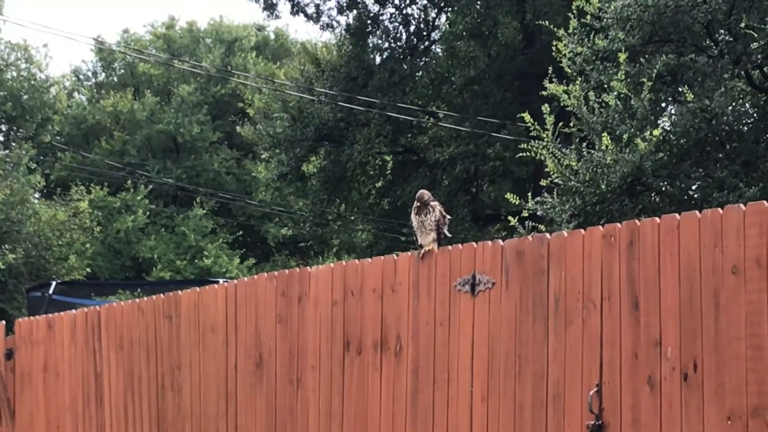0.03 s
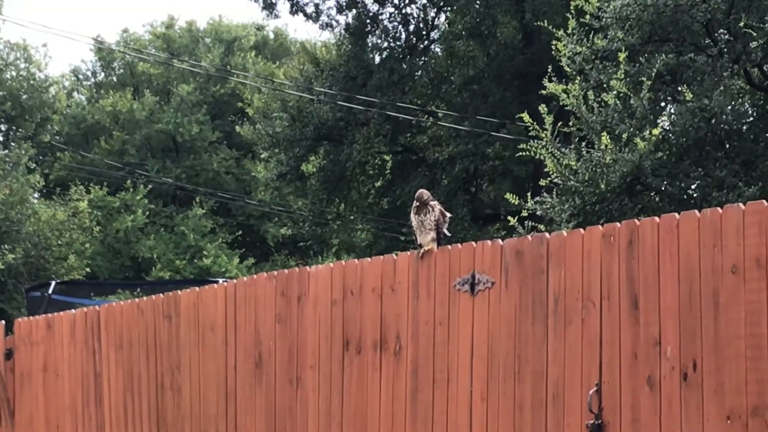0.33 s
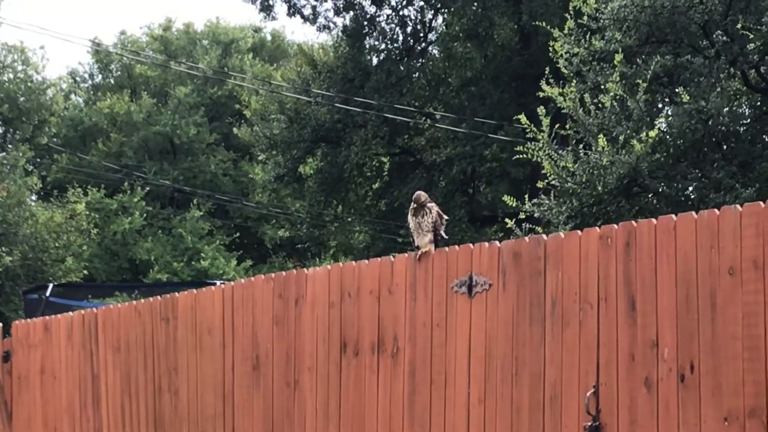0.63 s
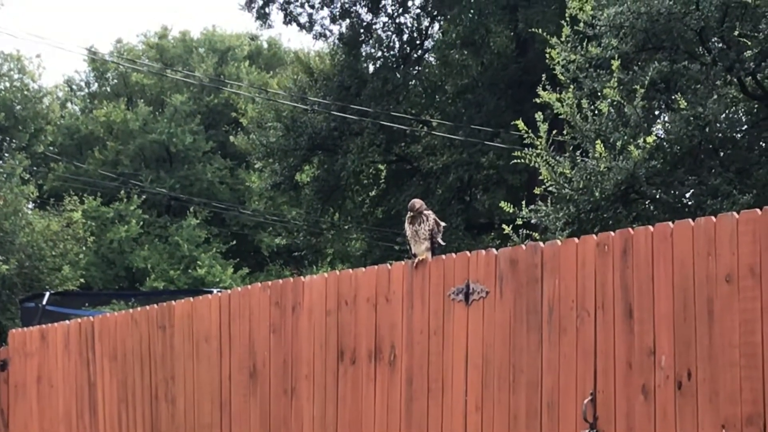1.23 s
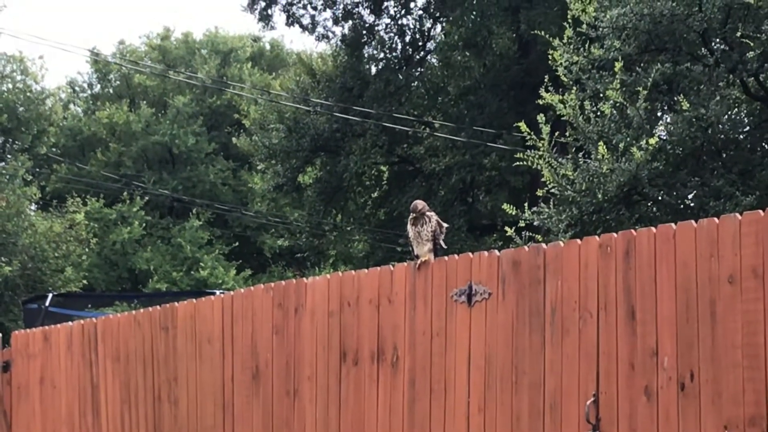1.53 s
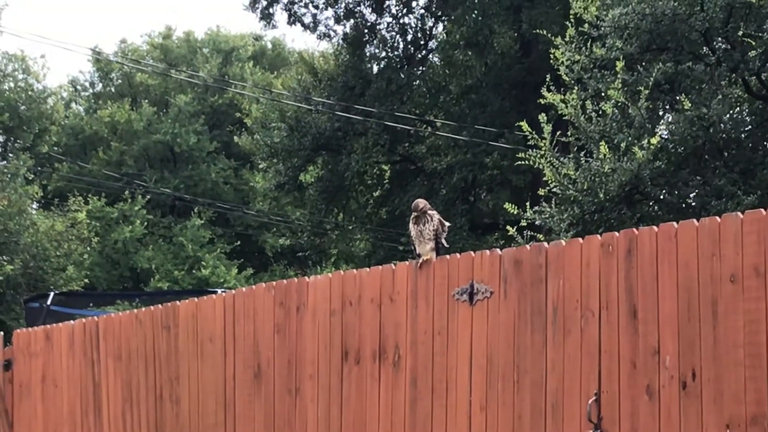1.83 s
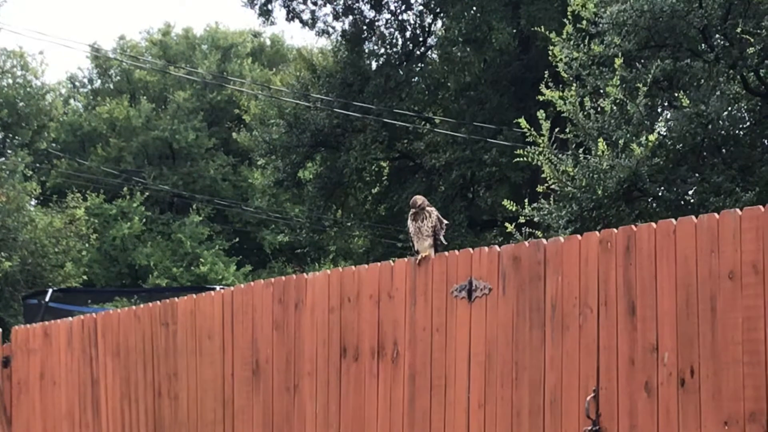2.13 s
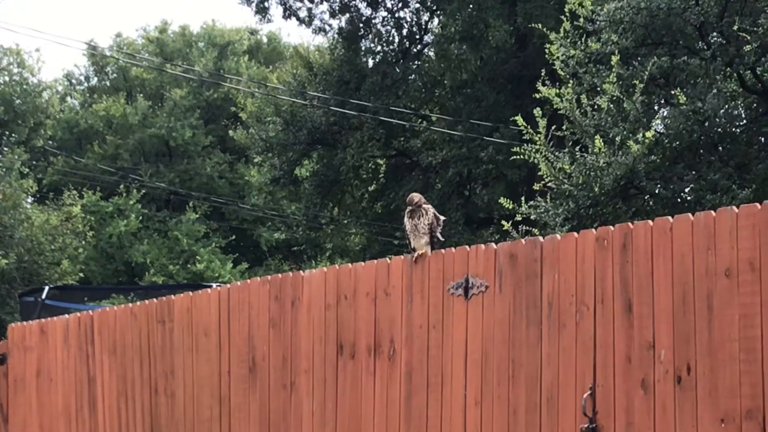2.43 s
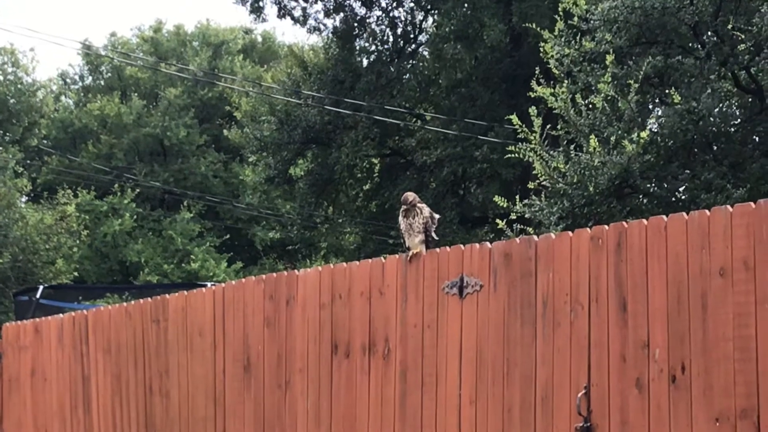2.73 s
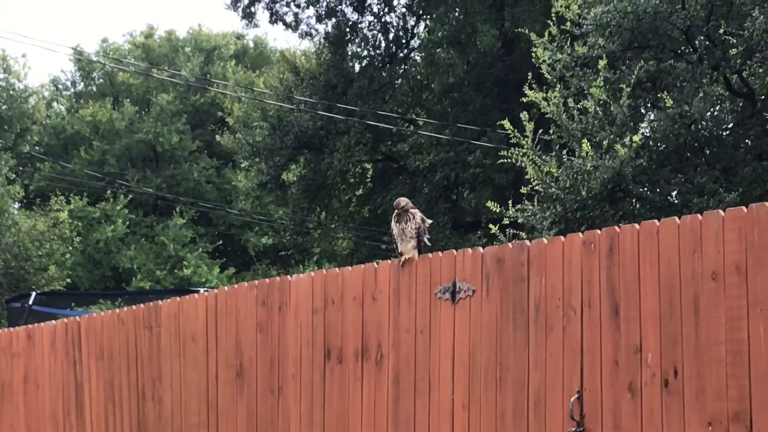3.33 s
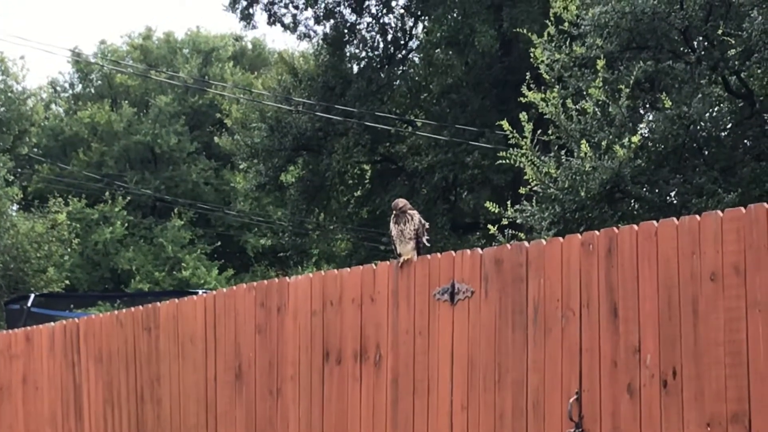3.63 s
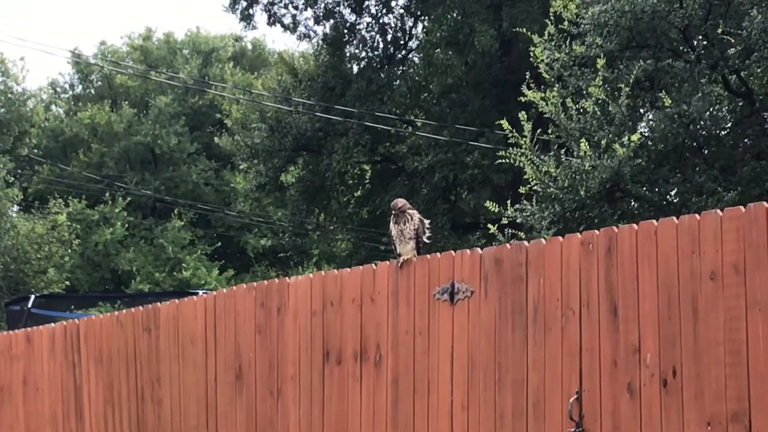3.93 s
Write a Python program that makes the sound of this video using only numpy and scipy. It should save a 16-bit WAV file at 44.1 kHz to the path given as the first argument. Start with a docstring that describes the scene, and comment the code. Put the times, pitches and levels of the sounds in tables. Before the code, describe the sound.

A nearby hawk squeals upward, squawks harshly, rasps, then holds a high whistle that rings briefly through a garden. Afterward, faint bird chatter and sharp chips continue over a steady insect buzz and a low distant rumble.

```python
"""A garden, with a hawk on the fence: it gives a rising squeal, a harsh squawk, a rasp and a long whistle.
Squeal and whistle are harmonic tones of the syrinx, the squawk is a pulse train ringing the throat,
and the rasp is fluttering noise. Other birds answer from the trees with faint rising whistles,
chatter and sharp chips. Insects buzz steadily over a distant low rumble and the hiss of open air.
The fence returns distinct reflections of the calls, the foliage a diffuse reverberation."""
import sys
import numpy as np
from scipy import signal
from scipy.fft import rfft, irfft
from scipy.io import wavfile

SR = 44100
rng = np.random.default_rng(int(sys.argv[2]) if len(sys.argv) > 2 else 0)


def wrap_up_sound(samples):
    """Save the sound to the file named by the first command line argument, as 16-bit audio."""
    columns = np.atleast_2d(samples).T
    # keep every value between -1 and 1, then stretch to whole-number steps
    tamed = np.clip(columns, -1, 1)
    steps = np.round(tamed * 32767).astype(np.int16)
    wavfile.write(sys.argv[1], SR, steps)


N = 176400
TIME = np.arange(N) / SR

# Spectra of the steady noises: frequency_hz, gain_db
RUMBLE_SPECTRUM = [(20, -29), (32, -24), (48, -11), (66, -4.5), (77, 1.5), (90, -9.5), (125, -9.5),
                   (165, -14.5), (220, -19.5), (300, -30.5), (450, -39.5), (900, -76)]
AIR_SPECTRUM = [(150, -35), (250, -4), (372, -8.5), (658, -5), (882, -9.5), (961, -9), (1200, -18),
                (1610, -20.5), (2090, -21), (2800, -20), (4170, -19.5), (6000, -28.5), (7510, -30.5),
                (8620, -10), (9070, -21), (9890, -54), (11100, -32), (11800, -37), (12700, -36.5),
                (15500, -41)]
INSECT_SPECTRUM = [(6000, -63), (7400, -18.5), (8000, -10.5), (8600, 4.5), (8900, 0), (9300, -15),
                   (10000, -33), (11000, -60)]
# Far-off hums: centre_s, length_s, frequency_hz, width_hz, level_db
HUMS = [(0.094, 0.14, 590, 90, -51.5), (2.75, 0.25, 660, 120, -57.5), (3.852, 0.96, 676, 25, -61.5),
        (3.849, 0.68, 757, 70, -67)]
# Envelope of the far midrange wash: time_s, level_db
WASH_ENVELOPE = [(0, -69.5), (1.5, -61.5), (2.6, -63), (3.4, -62), (3.7, -78), (4, -81)]
# Reverberation time of the trees: frequency_hz, t60_s
TREE_DECAY = [(500, 0.61), (2500, 0.93), (6000, 0.87), (12000, 0.71)]
# Reflections from boards and ground: delay_s, gain
REFLECTIONS = [(.0043, 0.14), (.013, 0.12), (.029, .1), (.061, .09), (.084, .07)]

# Far rising whistles: end_s, length_s, top_pitch_hz, level_db
FAR_CALLS = [(0.156, 0.36, 1895, -62.5), (0.794, 0.37, 1910, -56.5), (1.391, .33, 1869, -58.5),
             (2.028, 0.33, 1895, -59.5), (2.722, 0.37, 1848, -59.5)]
# Their shared contour: length_fraction, pitch_ratio, gain_db
FAR_CONTOUR = [(0, .61, -3.5), (.3, .655, -2), (.55, .72, 1), (.78, .89, 2), (0.929, 0.98, -2.5),
               (1, 0.99, 1)]
# Their harmonics: harmonic_number, gain_db
FAR_PARTIALS = [(1, 2.5), (2, -7), (3, -4), (4, 0)]
# Their filtering on the way through the trees: frequency_hz, gain_db
FAR_PATH_RESPONSE = [(1500, 0), (2300, -4), (2850, 4.5), (3700, 1), (4200, -10), (4700, -14), (5300, -6.5),
                     (6200, -21)]
# Far chatter, and at the very start the high fading tail of an earlier call:
# centre_s, length_s, pitch_hz, width_hz, level_db
CHATTER_AND_TAIL = [(0.025, 0.18, 4350, 707, -54), (.02, 0.18, 6200, 1100, -64),
                    (0.039, 0.16, 3030, 500, -55), (0.779, 0.092, 4550, 304, -56),
                    (1.942, .1, 3100, 357, -63), (1.98, 0.08, 2540, 151, -57.5),
                    (2.2, 0.24, 3630, 946, -63.5), (2.292, 0.25, 2446, 139.1, -66.5),
                    (2.365, 0.17, 4060, 587, -60.5), (2.635, 0.18, 3100, 394, -59),
                    (2.83, 0.21, 3250, 497, -65.5), (2.93, 0.086, 3185, 703, -62),
                    (3.019, .2, 3360, 457, -61.5), (3.156, 0.16, 3730, 857, -57),
                    (3.3, 0.22, 3890, 551, -69), (3.54, 0.18, 3763, 701, -66.5),
                    (3.645, 0.16, 2780, 221, -63.5), (3.91, 0.083, 4230, 555, -56.5),
                    (3.965, .09, 3950, 800, -59)]
# Chips of a small bird: start_s, top_pitch_hz, level_db, sweep_fraction
CHIP_NOTES = [(.934, 7830, -48, .24), (1.7135, 7670, -43, 0.25), (2.723, 7810, -41.5, .25),
              (3.451, 7470, -49, 0.14)]

# Dull ticks, crisp snicks and sharp snaps: start_s, level_db, decay_s
DULL_TICKS = [(.183, -48, .008), (.193, -38, 0.008), (.477, -41, 0.0045), (.486, -40, 0.0059),
              (.506, -37, 0.0026), (.76, -47.5, 0.015), (.773, -43, 0.0057)]
CRISP_SNICKS = [(.18, -58, .014), (.477, -48, 0.0044), (.486, -48, .005), (.506, -50, .003),
                (.773, -57, 0.0034), (2.922, -56.5, 0.021)]
SHARP_SNAPS = [(.9115, -33, 0.0027), (.917, -43, 0.0068), (.967, -39, 0.0018), (1.2245, -34, 0.0039),
               (1.265, -38, 0.0019)]
# Their spectra: frequency_hz, gain_db
TICK_SPECTRUM = [(250, -18), (600, -9), (950, -1.5), (1600, -14), (3500, -24), (5800, -17.5), (7000, -30),
                 (15000, -45)]
SNICK_SPECTRUM = [(2000, -12), (5000, 8), (9000, -4), (13000, 2), (15500, -5)]
SNAP_SPECTRUM = [(410, -44), (700, -30), (1450, -6), (2030, -23), (2370, -1), (3490, -13.5), (4520, -9),
                 (8760, -19), (15500, -44)]

# The hawk's rasps: start_s, length_s, level_db, decay_s
RASP_BURSTS = [(0.967, 0.022, -44.5, 0.034), (1.045, 0.039, -47.5, 0.03), (1.228, 0.0396, -44, 0.043),
               (1.263, 0.15, -37.5, 0.044)]
# Hoarse tones in the last rasp: frequency_hz, width_hz, level_db
HOARSE_TONES = [(1600, 210, -44), (3910, 110, -44.5), (5450, 120, -47), (7770, 150, -55)]
# Spectra of the rasp and of the hiss in the squeal: frequency_hz, gain_db
RASP_SPECTRUM = [(530, -46), (900, -13), (1320, -22), (1560, -4), (2100, -3), (2200, -5), (3670, -4.5),
                 (3890, -6.5), (5000, -15.5), (5570, -12), (5980, -11), (7860, -11.5), (15500, -33)]
SQUEAL_HISS_SPECTRUM = [(1500, -24), (3500, -4), (6300, 2), (8000, -4), (12000, -13), (15500, -20)]
# Course of the squawk: time_s, pulse_rate_hz, level_db
SQUAWK_CONTOUR = [(.985, 307, -40), (.988, 315, -29.5), (.996, 311.8, -35), (1.004, 313, -30),
                  (1.016, 316, -29.5), (1.042, 312, -30.5), (1.046, 309, -35), (1.06, 302, -52)]
# Resonances of the throat in the squawk: frequency_hz, gain_db
THROAT_RESPONSE = [(600, -45), (950, -36), (1254, -15.5), (1570, -38), (1890, -27), (2195, 3), (2510, -3),
                   (2820, -46), (3150, -22.5), (3760, -15.5), (4100, -31), (4700, -12), (5300, -22),
                   (6300, -14), (7250, -14.5), (7900, -25), (8500, -20), (9500, -29.5), (11200, -27),
                   (13000, -35), (15500, -54)]
# The squeal with its lead-in, and a brief note from the second side of the syrinx:
# time_s, pitch_hz, fundamental_db, second_harmonic_db, upper_harmonics_db
LEAD_IN_CONTOUR = [(0.1, 1096, -76, -60, -66), (0.14, 1441, -61.5, -51.5, -69),
                   (0.192, 1760, -63, -47, -69), (0.208, 1796, -52.5, -46.5, -65),
                   (0.235, 1475, -53.5, -59, -67)]
SQUEAL_CONTOUR = [(.235, 1173, -75, -41.5, -57), (.261, 1249, -55.5, -50.5, -59.5),
                  (0.334, 1568, -44, -50.5, -53.5), (.35, 1625, -47.5, -56, -63),
                  (.395, 1956, -50, -48, -52.5), (.435, 2156, -42.5, -50.5, -57),
                  (.475, 2351, -34.5, -39.5, -48.5), (.515, 2552, -34.5, -53.5, -48.5),
                  (.541, 2687, -39.5, -61, -56), (.559, 3010, -33, -56, -60), (.583, 3160, -33, -56, -76),
                  (.615, 3310, -42, -70, -79), (.635, 3340, -58, -70, -80), (.655, 3430, -64, -78, -92)]
SECOND_SIDE_CONTOUR = [(1.335, 2150, -66, -56, -66), (1.368, 2230, -53, -54.5, -66),
                       (1.392, 2200, -68, -56, -54)]
# The held whistle as heard with its echo, which notches it by interference and rings on after 1.7 s:
# time_s, pitch_hz, fundamental_db, second_harmonic_db, upper_harmonics_db
WHISTLE_WITH_ECHO = [(1.325, 2510, -50, -68, -85), (1.362, 2773, -48, -49, -50.5),
                     (1.378, 2790, -42.5, -43.5, -53.5), (1.408, 2861, -34.5, -30.5, -47.5),
                     (1.425, 2850, -33.5, -29.5, -49), (1.458, 2867, -29.5, -34, -52.5),
                     (1.486, 2865, -26, -45, -53.5), (1.508, 2850, -48, -45, -56),
                     (1.527, 2846, -28.5, -44.5, -58), (1.576, 2876, -35, -51, -56),
                     (1.6, 2856, -52, -71, -60), (1.62, 2840, -44, -50.5, -59),
                     (1.664, 2821, -34, -60, -61), (1.685, 2820, -52, -51, -61),
                     (1.705, 2830, -47, -77, -64), (1.74, 2848, -44, -85, -74),
                     (1.88, 2896, -50.5, -92, -90), (1.96, 2845, -57, -99, -99)]
# Balance of the upper harmonics in these notes: harmonic_number, gain_db
LEAD_IN_OVERTONES = [(3, 1.5), (4, 1), (5, -1), (6, -9)]
SQUEAL_OVERTONES = [(3, -1.5), (4, 1), (5, -9), (6, -1), (7, -5), (8, -13), (9, -12), (10, -19), (11, -16)]
WHISTLE_OVERTONES = [(3, 7.5), (4, 9), (5, -8)]
# Spectral envelope of those harmonics, duller toward the top: frequency_hz, gain_db
OVERTONE_RESPONSE = [(3500, 13), (4700, -10.5), (6300, 2), (7000, -6), (8000, -3.5), (11500, -8),
                     (14500, -6), (15700, -19)]


def amp(db):
    """Amplitude ratio of a level in decibels."""
    return 10 ** (np.asarray(db) / 20)


def unit(x):
    """Normalisation to an rms of 1."""
    return x / np.sqrt(np.mean(x ** 2) + 1e-20)


def curve_at(points, hz):
    """Interpolation on a logarithmic frequency axis."""
    f, value = np.transpose(points)
    return np.interp(np.log(hz + 1), np.log(f + 1), value)


def add(mix, start_s, sound):
    """Superposition: a sound adds to the mix from a given time."""
    at = round(start_s * SR)
    sound = sound[max(-at, 0):]
    part = mix[max(at, 0):][:len(sound)]
    part += sound[:len(part)]


def noise(spectrum):
    """Spectral shaping: white noise takes on a given colour."""
    gain = amp(curve_at(spectrum, np.fft.rfftfreq(N, 1 / SR)))
    return unit(irfft(rfft(rng.standard_normal(N)) * gain, N))


def band(hz, width_hz):
    """Noise in a Gaussian band; centred on 0 Hz it is a random drift."""
    bell = np.exp(-2 * ((np.fft.rfftfreq(N, 1 / SR) - hz) / width_hz) ** 2)
    return unit(irfft(rfft(rng.standard_normal(N)) * bell, N))


def gate(start_s, end_s, edge_s):
    """An envelope with linear attack and release."""
    return np.clip((TIME - start_s) / edge_s, 0, 1) * np.clip((end_s - TIME) / edge_s, 0, 1)


def phase_of(hz):
    """Phase in radians is the time integral of angular frequency."""
    return 2 * np.pi * np.cumsum(hz) / SR


def background(rumble_db=-39.5, air_db=-54, swell_db=-0.55):
    """Broadband noise: a distant low rumble and the gently wavering hiss of open air."""
    rumble = amp(rumble_db) * noise(RUMBLE_SPECTRUM)
    air = amp(air_db) * noise(AIR_SPECTRUM) * amp(swell_db * band(0, 9.2))
    return rumble + air


def drones(wash_hz=1157, wash_width_hz=650):
    """Band-limited noise: narrow bands are heard as far hums, a wide one as a midrange wash."""
    hums = sum(amp(db) * band(hz, width) * gate(centre - length / 2, centre + length / 2, length / 2)
               for centre, length, hz, width, db in HUMS)
    wash_level = amp(np.interp(TIME, *np.transpose(WASH_ENVELOPE)))
    return hums + wash_level * band(wash_hz, wash_width_hz)


def insects(level_db=-59, stroke_hz=61.3, drift=0.0032, sweep_hz=170, depth=0.48, snap=0.18):
    """Amplitude and frequency modulation: a high noise band throbs and slides up with each stroke."""
    stroke = phase_of(stroke_hz * (1 + drift * band(0, 6.7)))
    shift_hz = sweep_hz * (np.sin(stroke) - 0.5 * np.sin(2 * stroke))
    buzz = (signal.hilbert(noise(INSECT_SPECTRUM)) * np.exp(1j * phase_of(shift_hz))).real
    throb = 1 + depth * np.cos(stroke) + snap * np.cos(2 * stroke)
    return amp(level_db) * unit(buzz * throb)


def trees(x, reflections_per_s=3000, onset_s=0.0046, early_db=3, early_s=0.016):
    """Scattering: foliage returns many weak reflections, whose decay time depends on frequency."""
    t = TIME[:SR]
    taps = rng.standard_normal(SR) * (rng.random(SR) < reflections_per_s / SR)
    taps *= np.clip(t / onset_s, 0, 1)
    taps *= 1 + amp(early_db) * np.exp(-t / early_s)  # the nearest leaves reflect most strongly
    hz, frame_s, spectra = signal.stft(taps, SR, nperseg=256)
    decay = amp(-60 * frame_s / curve_at(TREE_DECAY, hz)[:, None])
    tail = signal.istft(spectra * decay, SR, nperseg=256)[1]
    return signal.fftconvolve(x, tail / np.linalg.norm(tail))[:N]


def fence(x):
    """Early reflections: boards and ground add a few delayed copies to the direct sound."""
    out = x.copy()
    for delay_s, gain in REFLECTIONS:
        add(out, delay_s, gain * x)
    return out


def far_whistles(jitter=0.0044, flicker=0.28):
    """Propagation through trees filters the harmonics of rising whistles and makes them flicker."""
    out = np.zeros(N)
    fraction, pitch_ratio, swell_db = np.transpose(FAR_CONTOUR)
    for end, length, top_hz, db in FAR_CALLS:
        progress = np.arange(0, length, 1 / SR) / length
        n = len(progress)
        pitch = top_hz * np.interp(progress, fraction, pitch_ratio) * (1 + jitter * band(0, 100)[:n])
        phase = phase_of(pitch)
        tone = np.zeros(n)
        for k, gain_db in FAR_PARTIALS:
            path_gain = amp(curve_at(FAR_PATH_RESPONSE, k * pitch))
            fluctuation = 1 + flicker * k * band(0, 53)[:n]
            tone += amp(gain_db) * path_gain * fluctuation * np.sin(k * phase)
        envelope = amp(db + np.interp(progress, fraction, swell_db)) * signal.windows.tukey(n, 0.1)
        add(out, end - length, tone * envelope)
    return out


def chatter_and_tail(notes_per_s=55, note_s=0.04, slide_hz_per_s=4600, spread=0.5, blur=0.92):
    """Linear chirps blurred by scattering in leaves: far chatter and an earlier call's high tail."""
    out, t = np.zeros(N), np.arange(0, note_s, 1 / SR)
    for centre, length, hz, width, db in CHATTER_AND_TAIL:
        start, end = centre - length / 2, centre + length / 2
        notes = np.zeros(N)
        for at in np.arange(start, end, 1 / notes_per_s):
            offset, slide, late = rng.standard_normal(3)
            pitch = hz + spread * width * offset + slide_hz_per_s * slide * (t - note_s / 2)
            add(notes, at - note_s / 2 + 0.005 * late, np.hanning(len(t)) * np.sin(phase_of(pitch)))
        out += amp(db) * (0.98 * notes + blur * band(hz, width)) * gate(start, end, length / 2)
    return out


def chips(length_s=0.016, peak_fraction=0.62, octave_db=-24, fade_db=-9):
    """Rapid frequency sweeps: each chip of a small bird rises, tops out and turns down."""
    out, progress = np.zeros(N), np.arange(0, length_s, 1 / SR) / length_s
    below_top = np.cos(np.pi / 2 * progress / peak_fraction) ** 2
    arch = 2 * np.sqrt(abs(np.sin(np.pi * progress)))
    for start, top_hz, db, sweep in CHIP_NOTES:
        phase = phase_of(top_hz * (1 - sweep * below_top))
        tone = np.sin(phase) + amp(octave_db) * np.sin(2 * phase)
        add(out, start, amp(db + fade_db * progress) * arch * tone)
    return out


def clicks(bursts, spectrum):
    """Transients: noise with a sudden onset and a fast exponential decay."""
    envelope = sum((TIME > start) * amp(db) * np.exp(-abs(TIME - start) / decay)
                   for start, db, decay in bursts)
    return noise(spectrum) * envelope


def rasps(flutter_hz=310, depth=0.26, tones_start_s=1.266, tones_length_s=0.03):
    """Roughness from fast amplitude modulation: harsh noise flutters, and hoarse tones catch in it."""
    flutter = 1 + depth * np.sin(phase_of(flutter_hz * (1 + 0.302 * band(0, 145))))
    envelope = sum(gate(start, start + length, 0.0026) * amp(db) * np.exp(-abs(TIME - start) / decay)
                   for start, length, db, decay in RASP_BURSTS)
    tones = sum(amp(db) * band(hz, width) for hz, width, db in HOARSE_TONES)
    tones *= gate(tones_start_s, tones_start_s + tones_length_s, 0.0071)
    return envelope * flutter * noise(RASP_SPECTRUM) + tones


def squawk(jitter=0.0054, hiss_gain=0.066, open_s=0.008, shut_db_per_octave=-10,
           phase_spread_rad=0.8, sweep_hz_per_s=3e6):
    """Source and filter: fast pulses ring the throat, and the treble comes in as the bill opens."""
    times, rate_hz, db = np.transpose(SQUAWK_CONTOUR)
    envelope = gate(times[0], times[-1], 0.0014)
    on = envelope > 0
    phase = phase_of(np.interp(TIME[on], times, rate_hz) * (1 + jitter * band(0, 400)[on]))
    bill_shut = np.exp(-(TIME[on] - times[0]) / open_s)
    voice = np.zeros(len(phase))
    for k in range(2, 50):
        hz = k * rate_hz[2]  # nominal frequency of this harmonic
        bill_db = shut_db_per_octave * bill_shut * max(np.log2(hz / 2500), 0)
        lag = np.pi * hz ** 2 / sweep_hz_per_s  # highs come later, so each pulse sweeps upward
        scatter = phase_spread_rad * rng.standard_normal()
        voice += amp(curve_at(THROAT_RESPONSE, hz) + bill_db) * np.cos(k * phase - lag + scatter)
    pulsed_hiss = noise(RASP_SPECTRUM)[on] * (1 + 0.41 * np.cos(phase))
    out = np.zeros(N)
    out[on] = unit(voice) + hiss_gain * pulsed_hiss
    return out * envelope * amp(np.interp(TIME, times, db))


def squeal_hiss(gain_db=-7, flutter=0.38):
    """Randomly modulated noise rides on the squeal, following the level of its upper harmonics."""
    times, *_, upper_db = np.transpose(SQUEAL_CONTOUR)
    envelope = amp(gain_db + np.interp(TIME, times, upper_db)) * gate(times[0], times[-1], 0.01)
    return envelope * noise(SQUEAL_HISS_SPECTRUM) * (1 + flutter * band(0, 200))


def whistle(contour, overtones, jitter, shimmer, breath_db, waver_db):
    """A nearly periodic tone is a harmonic series; random modulation adds breathy sidebands."""
    times, hz, first_db, second_db, upper_db = np.transpose(contour)
    envelope = gate(times[0] - 0.003, times[-1] + 0.0018, 0.004)
    on = envelope > 0
    t = TIME[on]
    pitch = np.interp(t, times, hz) * (1 + jitter * band(0, 175)[on])
    phase = phase_of(pitch)
    tone = np.zeros(N)
    tone[on] = amp(np.interp(t, times, first_db)) * np.sin(phase)
    tone[on] += amp(np.interp(t, times, second_db)) * np.sin(2 * phase)
    for k, gain_db in overtones:
        level_db = np.interp(t, times, upper_db) + gain_db + curve_at(OVERTONE_RESPONSE, k * pitch)
        level_db += waver_db * band(0, 26)[on]  # each overtone wavers separately
        tone[on] += amp(level_db) * np.sin(k * phase) * (k * pitch < SR / 2)
    modulation = 1 + shimmer * band(0, 52) + amp(breath_db) * band(0, 2800)
    return np.sqrt(2) * tone * envelope * modulation


def scene():
    """Superposition of insects and air, birds in the trees, the hawk close by and the calls' echoes."""
    bed = background() + insects() + drones()
    held = whistle(WHISTLE_WITH_ECHO, WHISTLE_OVERTONES,
                   jitter=0.0024, shimmer=0.18, breath_db=-25, waver_db=2)
    lead_in = whistle(LEAD_IN_CONTOUR, LEAD_IN_OVERTONES,
                      jitter=0.0058, shimmer=0.54, breath_db=-11, waver_db=5)
    rise = whistle(SQUEAL_CONTOUR, SQUEAL_OVERTONES,
                   jitter=0.0042, shimmer=0.33, breath_db=-23, waver_db=4)
    squeal = lead_in + rise + squeal_hiss()
    second_side = whistle(SECOND_SIDE_CONTOUR, WHISTLE_OVERTONES,
                          jitter=0.0087, shimmer=0.37, breath_db=-3.5, waver_db=1.5)
    harsh = (second_side + rasps() + clicks(SHARP_SNAPS, SNAP_SPECTRUM)
             + clicks(DULL_TICKS, TICK_SPECTRUM) + clicks(CRISP_SNICKS, SNICK_SPECTRUM))
    cry, small_bird, far_birds, chirps = squawk(), chips(), far_whistles(), chatter_and_tail()
    reverberation = trees(amp(-8.5) * squeal + amp(-6.5) * harsh + amp(-7) * cry + amp(-13.5) * held
                          + amp(-8.5) * small_bird + amp(-1) * far_birds + amp(-3) * chirps)
    near = fence(squeal + harsh + cry + small_bird) + amp(-2.5) * held
    distant = amp(-2) * far_birds + amp(0.5) * chirps
    return (bed + distant + near + reverberation)[None]


def record(dry, cutoff_hz=15720):
    """Band limiting: a linear-phase low-pass filter removes the highest treble."""
    low_pass = signal.firwin(511, cutoff_hz, window=("kaiser", 9), fs=SR)
    return signal.oaconvolve(dry, low_pass[None], "same")


dry = scene()
out = record(dry)
wrap_up_sound(out)
```